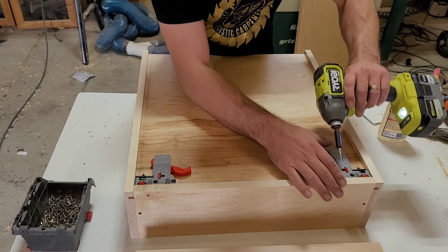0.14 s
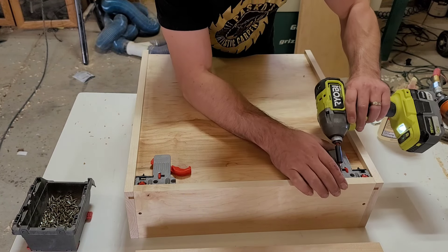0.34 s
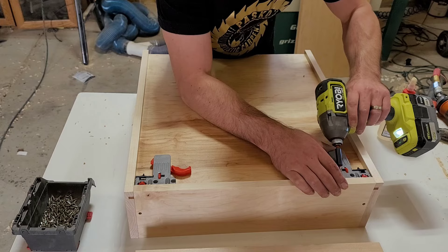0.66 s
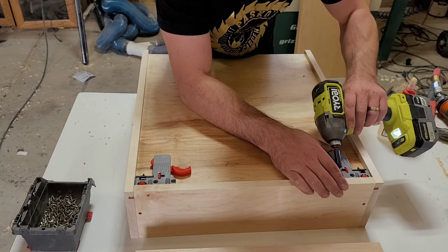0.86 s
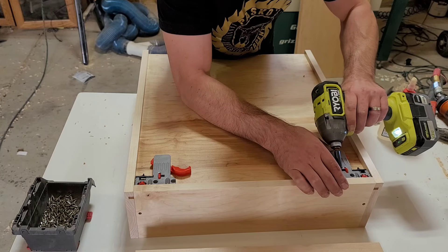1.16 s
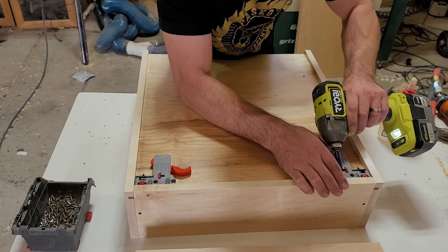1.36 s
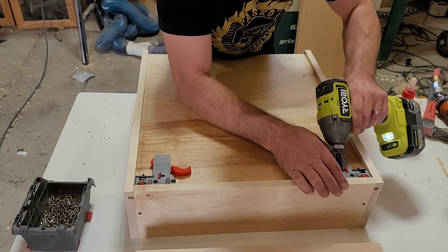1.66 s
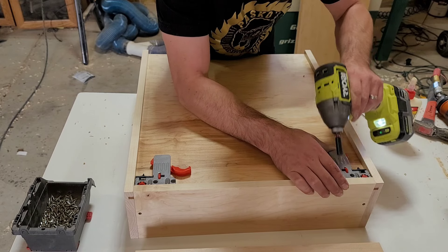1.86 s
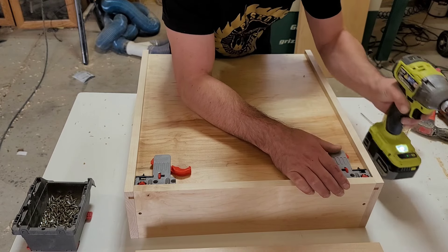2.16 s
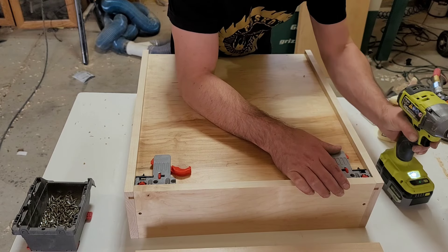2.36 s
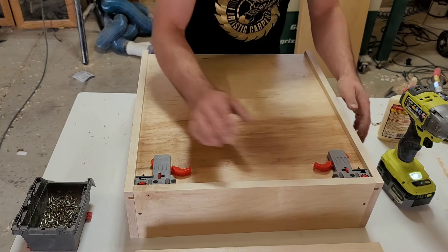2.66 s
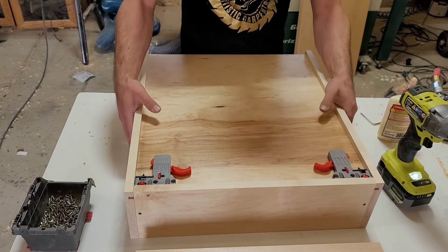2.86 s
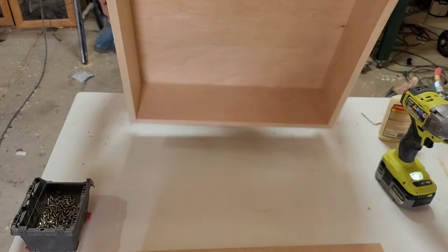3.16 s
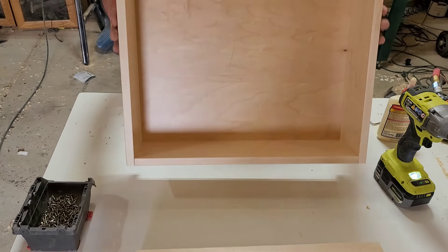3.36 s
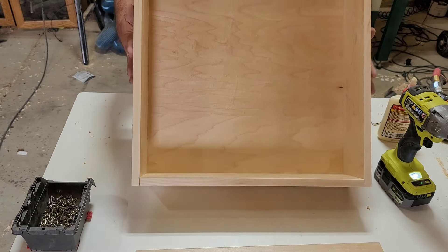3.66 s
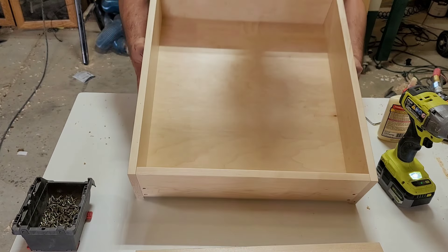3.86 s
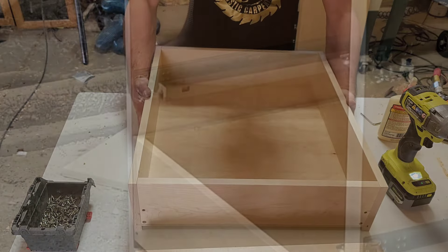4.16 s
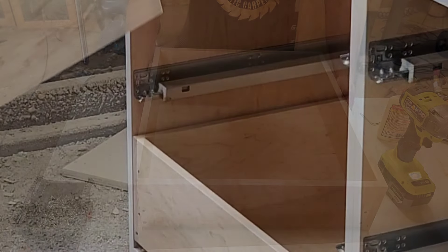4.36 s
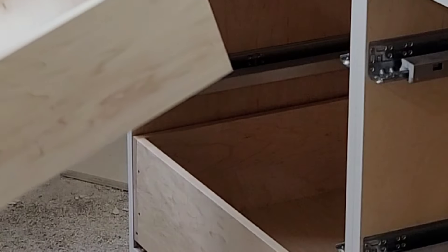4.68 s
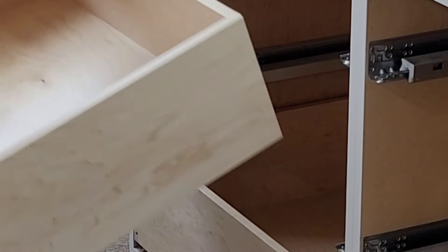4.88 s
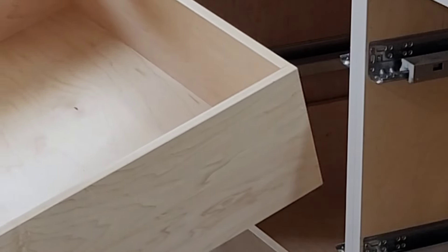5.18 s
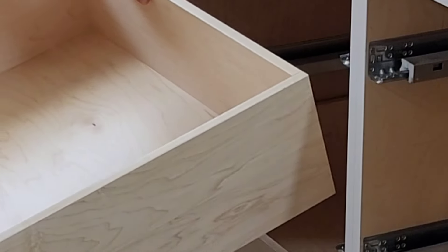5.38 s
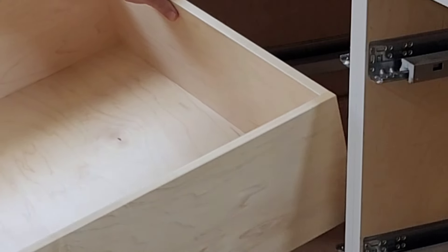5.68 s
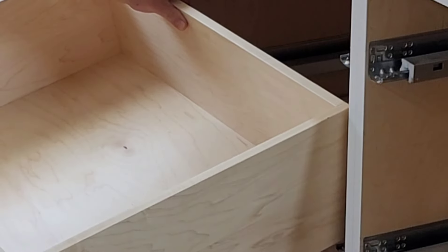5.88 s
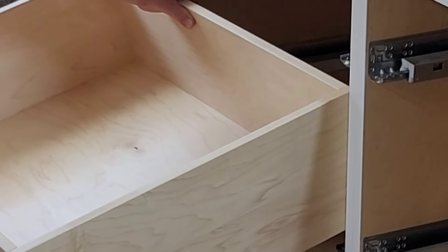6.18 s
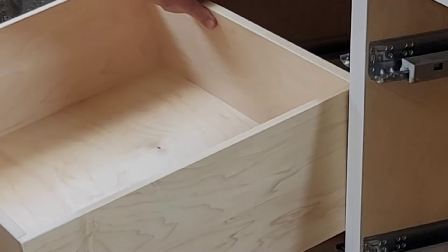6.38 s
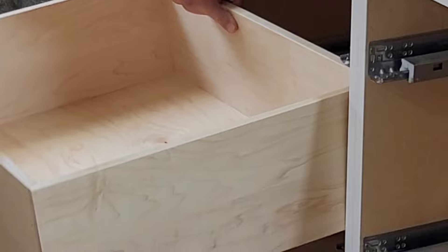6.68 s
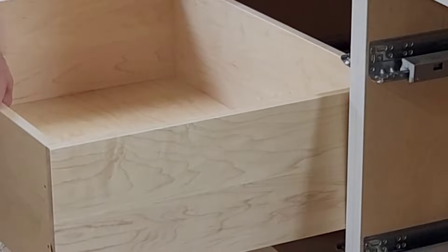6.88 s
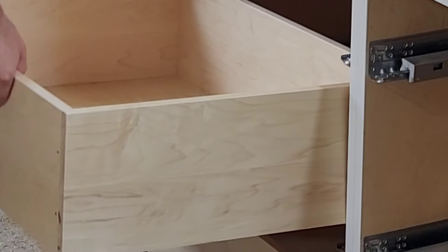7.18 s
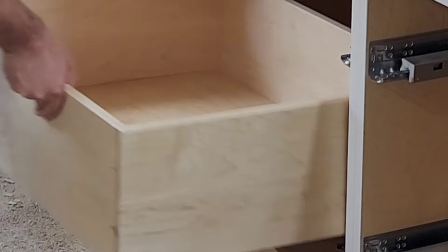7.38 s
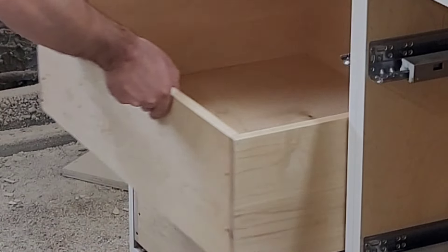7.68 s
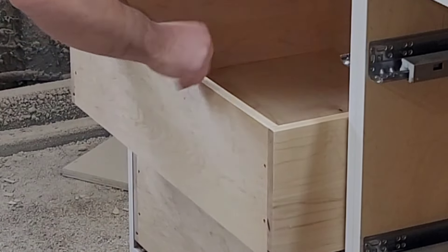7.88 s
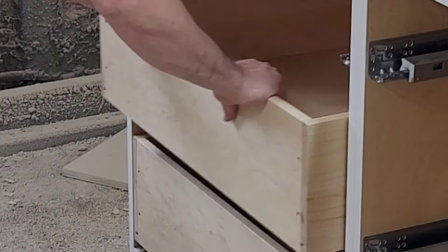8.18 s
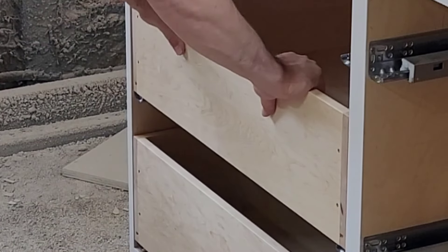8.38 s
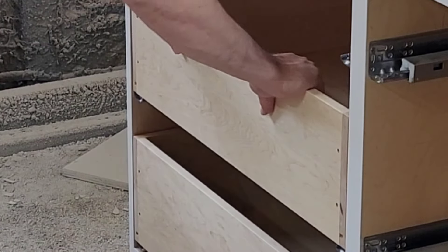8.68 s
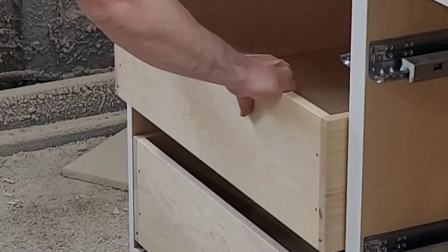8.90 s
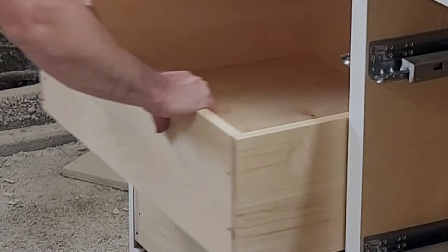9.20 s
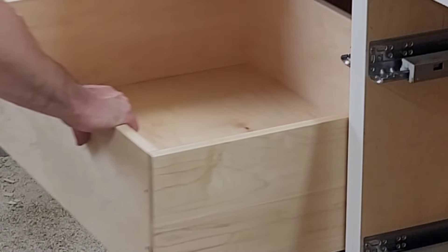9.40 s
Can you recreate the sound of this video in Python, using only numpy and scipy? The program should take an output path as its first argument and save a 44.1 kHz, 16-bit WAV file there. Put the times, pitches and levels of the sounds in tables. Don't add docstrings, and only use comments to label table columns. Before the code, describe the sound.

In a small hard workshop, close stereo microphones catch small ticks, then a cordless driver buzzing a screw into a hollow wooden drawer for under a second. The tool clunks down, the drawer is turned over with a loud double knock and edge tap. Hands brush wood, the drawer thumps low onto metal runners, scrapes, creaks, bangs home, snaps into its catches, and is finally pulled out softly.

```python
import sys
import numpy as np
from scipy import signal
from scipy.fft import rfft, irfft, next_fast_len
from scipy.io import wavfile
from scipy.ndimage import uniform_filter1d, map_coordinates

SR = 44100
rng = np.random.default_rng(int(sys.argv[2]) if len(sys.argv) > 2 else 0)


def to_wav(sig):
    pcm = np.clip(np.atleast_2d(sig), -1, 1) * 32767
    pcm = np.round(pcm).astype(np.int16)
    wavfile.write(sys.argv[1], SR, pcm.T)


def voltage_ratio(level):
    return 10 ** (np.asarray(level, float) / 20)


N = 421036


def rms_one(x):
    return x / np.sqrt(np.mean(x ** 2) + 1e-20)


def in_time(rows, fade=0.014):
    s, *columns = np.transpose(rows)
    t = np.arange(N) / SR
    curves = [np.interp(t, s, c) for c in columns]
    gate = np.interp(t, [s[0] - fade, s[0], s[-1], s[-1] + fade], [0, 1, 1, 0])
    return curves + [gate]


def at_hz(points, hz):
    return np.interp(np.log(hz), np.log(np.array(points)[:, 0] + 1), np.array(points)[:, 1])


def drift(rate, count=N):
    knots = rng.standard_normal(count // 200 + 400)
    r = np.exp(-2 * np.pi * rate * 200 / SR)
    slow = rms_one(signal.lfilter([1], [1, -2 * r, r * r], knots)[398:])
    return np.interp(np.arange(count) / 200, np.arange(len(slow)), slow)


def colour(x, spectrum, low_hz, high_hz, peaks=()):
    size = next_fast_len(x.shape[-1])
    hz = np.arange(size // 2 + 1) * SR / size + 1
    edges = np.sqrt((1 + (low_hz / hz) ** 8) * (1 + (hz / high_hz) ** 8))
    gain = voltage_ratio(at_hz(spectrum, hz)) / edges
    for centre, width, lift_db in peaks:
        gain *= 1 + (voltage_ratio(lift_db) - 1) / (1 + (2 * (hz - centre) / width) ** 2)
    return rms_one(irfft(rfft(x, size) * gain, size)[..., :x.shape[-1]])


# f/Hz, left-right correlation
COHERENCE = [(60, 0.93), (130, 0.99), (290, .88), (640, 0.51), (1400, 0.013), (3000, 0.007),
             (15000, 0.0098)]


def stereo_noise(count, grain_db=0.0, grain_rate=60):
    size = next_fast_len(count)
    alike = np.clip(at_hz(COHERENCE, np.arange(size // 2 + 1) * SR / size + 1), -1, 1)
    mid, side = rfft(rng.standard_normal((2, size)))
    both = np.sqrt(1 + alike) * mid + np.sqrt(1 - alike) * side * np.array([[1], [-1]])
    return rms_one(irfft(both, size)[:, :count]) * voltage_ratio(grain_db * drift(grain_rate, count=count))


def ring(clicks, hz, t60):
    r, w = voltage_ratio(-60 / (t60 * SR)), 2 * np.pi * hz / SR
    return signal.lfilter([0, np.sin(w)], [1, -2 * r * np.cos(w), r * r], clicks + 1e-18)


def dying(s, db, t60, rise=.001):
    start = round(s * SR)
    t = np.arange(min(round(t60 * SR), N - start)) / SR
    return slice(start, start + len(t)), voltage_ratio(db - 60 * t / t60) * (1 - np.exp(-t / rise))


def strokes(rows, offset_db=0, share=0, haste=1):
    t, power = np.arange(0, N + 64, 64) / SR, 0
    for s, press_db, bright_db, rise, fall in rows:
        away = np.maximum((s - t) / rise, haste * (t - s) / fall)
        level_db = press_db + offset_db + share * bright_db - 20 * away ** 1.353
        power = power + voltage_ratio(level_db) ** 2
    return np.interp(np.arange(N) / SR, t, np.sqrt(power))


# f/Hz, level/dB per Hz
AIR = [(12, -28.5), (20, -8.5), (46, -5), (162, -19), (247, -18), (326, -22), (674, -20.5), (996, -34.5),
       (1320, -27.5), (15800, -60.5)]


def room_tone():
    return voltage_ratio(-58) * colour(stereo_noise(N), AIR, 15, 17000)


# t/s of most pressure, pressure level/dB,
# speed as brightness level/dB, rise t/s per 20 dB, fall t/s per 20 dB
DRAG_STROKES = [(0.3, -54, -31.5, 4.4, 4), (0.834, -52.5, -28, 0.21, 0.9), (2.0, -58, -19, 1.6, 2),
                (2.464, -54.5, -28, .3, .3), (3.0, -56, -30, 1.55, 0), (3.33, -51, -20, 0.27, 0.34),
                (3.652, -40.5, -7.5, 0.073, 0.66), (3.86, -50, -14, .3, .5), (4.4, -56, -15, 0.24, 0.22),
                (4.62, -62, 3, 0.16, 0.3), (4.79, -57, -4.5, 0.12, .4), (5.3, -59, -9.5, 0.4, 0.2)]
# f/Hz, level/dB per Hz
DRAG_COLOUR = [(18, -48), (30, -14), (111, 5.5), (145, -5), (244, -3), (326, -7), (566, -10), (1010, -23),
               (1240, -18), (2100, -32), (5680, -24), (13200, -42.5), (15800, -62.5)]


def drag():
    noise = stereo_noise(N, grain_db=1.6, grain_rate=60)
    rumble = strokes(DRAG_STROKES) * colour(noise, DRAG_COLOUR, 35, 450)
    scrape_gain = strokes(DRAG_STROKES, offset_db=4, share=0.46, haste=1.0)
    hiss_gain = strokes(DRAG_STROKES, offset_db=-8.5, share=0.97, haste=1.1)
    scrape = scrape_gain * colour(noise, DRAG_COLOUR, 600, 2500)
    hiss = hiss_gain * colour(noise, DRAG_COLOUR, 2000, 19000)
    return rumble + scrape + hiss


# f/Hz, level/dB per Hz
HOUSING = [(500, -10.5), (900, -8), (1500, -1), (3000, 0), (5500, -3.5), (7000, -11), (10000, -12),
           (14500, -12), (16500, -23.5)]


def contact_noise():
    noise = stereo_noise(N, grain_db=-1.5, grain_rate=150)
    return noise, colour(noise, HOUSING, 740, 5400), colour(noise, HOUSING, 6000, 24000)


# t/s, peak level/dB, ring f/Hz,
# top end level/dB re peak, broad noise level/dB re ring
TICKS = [(0.014, -40.5, 1930, -36, -7), (0.385, -46, 2370, -34, -3.5), (0.543, -43, 2060, -31, -3),
         (0.8029, -33.5, 3370, -7, -4), (0.917, -37, 3050, -12, 6), (3.2828, -47, 1640, -6, -3),
         (5.257, -35, 1150, -46, -7), (5.775, -42, 6200, -28, -10.5), (6.47, -25, 1580, -30, -3),
         (6.6824, -44, 1300, -40, -5), (6.797, -38, 1460, -30.5, -6), (6.9012, -31, 1470, -40, -9.5),
         (7.9039, -40.5, 1370, -38, -2.5), (8.046, -49, 1280, -22.5, -1), (9.37, -27, 5030, -24, -21),
         (9.384, -26.5, 5450, -36, -28)]


def ticks(contact):
    noise, broad, top = contact
    out = np.zeros((2, N))
    for s, peak_db, hz, top_db, broad_db in TICKS:
        t60 = 0.083 * (1500 / hz) ** 1.7 + 0.019
        at, envelope = dying(s, peak_db - 5.5, t60, rise=0.0026)
        tone = rms_one(ring(noise[:, at], hz, 0.0076))
        out[:, at] += envelope * (tone + voltage_ratio(broad_db) * broad[:, at] + voltage_ratio(top_db - 6.5) * top[:, at])
    return out


# middle t/s, rms level/dB, half length t/s
RUSTLES = [
    (0.128, -68.5, 0.025),
    (0.259, -66.5, 0.016),
    (2.49, -62.5, 0.029),
    (2.915, -64.5, 0.044),
    (3.233, -67, 0.066),
    (4.48, -62.5, 0.071),
    (4.605, -60.5, 0.063),
    (4.762, -61, 0.059),
    (5.147, -70.5, 0.025),
]


def rustles(contact):
    _, broad, top = contact
    t = np.arange(N) / SR
    swell = sum(voltage_ratio(level_db) * np.exp(-((t - s) / half) ** 2) for s, level_db, half in RUSTLES)
    return swell * (broad + 0.49 * top)


# f/Hz, level/dB per Hz
KNOCK = [(180, -33.5), (300, 11), (502, -8.5), (612, -10), (990, -15.5), (1080, -19), (1330, -15.5),
         (1500, -22.5), (1920, -19), (2230, -24.5), (4950, -26), (15800, -60)]


def wood_noise():
    noise = stereo_noise(N, grain_db=2.5, grain_rate=80)
    return colour(noise, KNOCK, 480, 1300), colour(noise, KNOCK, 1500, 17000)


def blows(events, body, wood, ring_share, push_db, crack_rise, crack_t60):
    low, (knock, crack) = np.zeros(N), wood
    chance, out = rng.normal(0, 1, (len(events), len(body), 2)), np.zeros((2, N))
    for (s, body_db, knock_db, crack_db, thud_hz), draws in zip(events, chance):
        for (hz, mode_db, mode_t60), (strength, late) in zip(body, draws):
            near_db = -7 * abs(np.log2(hz / thud_hz))
            start = s + abs(late) * 0.55 / hz
            level_db = body_db + push_db + mode_db + near_db + 0.56 * strength
            at, envelope = dying(start, level_db, ring_share * mode_t60, rise=0.53 / hz)
            low[at] += envelope * np.sin(2 * np.pi * hz * np.arange(len(envelope)) / SR)
        knock_t60 = 0.19 * (200 / thud_hz) ** .45
        at, envelope = dying(s, body_db + knock_db - 3.0, knock_t60, rise=0.004)
        out[:, at] += envelope * knock[:, at]
        at, envelope = dying(s, body_db + crack_db - 4.5, crack_t60, rise=crack_rise)
        out[:, at] += envelope * crack[:, at]
    return out + low


# t/s, body peak level/dB, knock level/dB re body, crack level/dB re body, thud f/Hz
BENCH_BLOWS = [
    (0.938, -39.5, -21, -25, 143),
    (2.332, -13.5, -9, -5, 190),
    (2.5, -39, -29, -15, 159),
    (2.818, -22, -11.5, -29, 253),
    (2.867, -37.5, -16, -28.5, 143),
    (3.491, -1, -11, -21, 130),
    (3.532, 0, -15, -18, 250),
    (4.185, -4, -3, -13, 402),
    (4.481, -30.5, -11.5, -61, 358),
]
# f/Hz, level/dB, decay t60/s
BENCH_BODY = [(72, 3.5, 0.39), (96, -3, 0.22), (121, -2, 0.2), (162.2, -7.5, 0.5), (195.6, -3, 0.17),
              (253.3, -3, 0.17), (320, -8, 0.074), (355, -10.5, 0.12), (400, 2, 0.078), (493, -9, 0.09)]


def bench_blows(wood):
    return blows(BENCH_BLOWS, BENCH_BODY, wood, 0.66, push_db=-6.0, crack_rise=0.00086, crack_t60=.11)


def close_echoes(x):
    left_lag_s = 0.00016
    late = np.interp(np.arange(len(x)) - left_lag_s * SR, np.arange(len(x)), x)
    t = np.arange(SR // 20) / SR
    scatter = stereo_noise(len(t)) * voltage_ratio(-60 * t / .07) * (t > .0008)
    scatter /= np.sqrt(np.sum(scatter ** 2, axis=1, keepdims=True))
    return np.array([.7 * late, .85 * x]) + .6 * signal.oaconvolve(x[None], scatter, axes=1)[:, :len(x)]


# t/s, f/Hz, level/dB
WHINE = [
    (1.03, 10100, -70),
    (1.06, 10100, -58),
    (1.3, 9800, -60),
    (1.64, 9700, -58),
    (1.7, 10000, -56),
    (1.79, 10000, -72),
]
# t/s, whirr level/dB
EFFORT = [
    (1.04, -49.5),
    (1.07, -41),
    (1.246, -28),
    (1.318, -25),
    (1.542, -25.5),
    (1.67, -30.5),
    (1.69, -41.5),
    (1.75, -42.5),
    (1.8, -65),
]
# f/Hz, width/Hz, lift level/dB
BUZZ = [(199.8, 50, 5), (350, 22, 14), (554, 46, 4.5)]
# f/Hz, width/Hz, lift level/dB
SHELL = [(840, 110, 4.5), (1190, 100, 1), (1680, 300, 3.5), (3798, 1800, 4.5)]


def driver():
    span = slice(round(.9 * SR), round(1.9 * SR))
    whirr_db, gate = (c[span] for c in in_time(EFFORT, fade=.004))
    t = np.arange(span.start, span.stop) / SR
    since = t - 1.278
    hz = np.maximum(512 - np.maximum(-1550 * since, 660 * since), 200)
    phase = 2 * np.pi * np.cumsum(hz * (1 + .002 * drift(30, count=len(hz)))) / SR
    bite_s, release_s = 1.22, 1.66
    clean = np.interp(t, [bite_s - .04, bite_s, release_s, release_s + .06], [.15, .76, .76, .15])
    stack = 0
    for k in range(1, 26):
        wander = voltage_ratio(3.5 * drift(9, count=len(hz)))
        stack = stack + wander * np.cos(k * phase + rng.uniform(0, 1.3))
    stack /= np.sqrt(uniform_filter1d(stack ** 2, size=2000))
    teeth = 1 + 0.7 * np.cos(phase)
    balance = [[.9], [1.1]]
    rough, airy = (stereo_noise(len(hz)) * balance * teeth for _ in range(2))
    tonal = close_echoes(colour(stack, HOUSING, 700, 4300, SHELL))
    noisy = colour(rough, HOUSING, 1300, 8500)
    whirr = clean * tonal + np.sqrt(1 - clean ** 2) * noisy
    hiss = voltage_ratio(-5 - 17 * (t - 1)) * colour(airy, HOUSING, 6300, 17000)
    buzz = voltage_ratio(-16.5 + 12 * since) * colour(airy, [(100, -5), (700, -8.5)], 152, 650, BUZZ)
    throb = voltage_ratio(1.5 * np.cos(phase / 14) + 2.4 * drift(60, count=len(hz)))
    out = np.zeros((2, N))
    out[:, span] = voltage_ratio(whirr_db + 0.5) * gate * throb * (whirr + hiss + buzz)
    whine_hz, whine_db, on = in_time(WHINE)
    return out + on * voltage_ratio(whine_db + 3 * drift(60)) * np.sin(2 * np.pi * np.cumsum(whine_hz) / SR)


# t/s, top end peak level/dB, decay t60/s,
# broad noise level/dB re top end
SPITS = [(1.056, -36, 0.032, -3), (1.4052, -6, 0.011, -25), (1.5308, -26, 0.026, -14),
         (1.5634, -27, 0.023, -16), (1.6452, -28.5, 0.03, -4), (1.6594, -33, 0.021, 2),
         (1.732, -54, 0.014, 6), (1.7404, -54, 0.013, 4), (1.7544, -59, 0.015, 10),
         (1.823, -35.5, 0.015, 12), (2.106, -61, 0.021, -5), (1.8281, -23.5, 0.016, 4),
         (2.2019, -43, 0.029, 1), (2.5732, -53.5, 0.048, -11), (4.177, -27, 0.025, 16),
         (8.277, -16, 0.033, 10.5)]


def snaps(contact):
    _, broad, top = contact
    out = np.zeros((2, N))
    for s, peak_db, t60, broad_db in SPITS:
        at, envelope = dying(s, peak_db + 1.5, max(t60, .008), rise=0.0006)
        out[:, at] += envelope * (top[:, at] + voltage_ratio(broad_db - 4.5) * broad[:, at])
    return out


# middle t/s, rms level/dB, half length t/s, f/Hz
RUBS = [(3.69, -36, .035, 110), (3.785, -50, .012, 700), (3.8, -44, .04, 250), (3.9, -47, .04, 230),
        (3.955, -47, .025, 215), (3.95, -53, .012, 550), (4.07, -44, .03, 120), (4.06, -52, .03, 420),
        (4.155, -54, .02, 620), (9.2, -50, .1, 330), (9.385, -56, .02, 5200), (3.75, -58, .2, 1250),
        (4.43, -60, .015, 1700), (4.62, -55, .03, 1480), (4.78, -57, .04, 1350), (5.29, -56, .03, 1120),
        (5.8, -70, .02, 5350), (5.87, -70, .05, 5300), (5.86, -68, .06, 3500), (5.975, -66, .025, 5350),
        (5.96, -70, .03, 4950), (6.2, -68, .015, 3500), (6.28, -70, .02, 5200), (6.49, -52, .015, 5250),
        (6.69, -68, .02, 5250), (6.77, -70, .03, 5700), (6.93, -62, .04, 2250), (7.03, -71, .04, 6300),
        (7.04, -70, .04, 5300), (7.75, -56, .1, 4050), (7.78, -56, .08, 5150), (8.15, -54, .05, 4050),
        (8.275, -26, .018, 2800), (8.285, -30, .012, 1700), (8.335, -33, .025, 5300), (8.3, -31, .012, 620)]


def rubs():
    out = np.zeros((2, N))
    for s, level_db, half, hz in RUBS:
        at = np.arange(round((s - 2.5 * half) * SR), round((s + 2.5 * half) * SR))
        t60 = 45 / hz * (hz / 1000) ** .5
        tone = rms_one(ring(stereo_noise(len(at)), hz, t60))
        out[:, at] += voltage_ratio(level_db) * np.exp(-((at / SR - s) / half) ** 2) * tone
    return out


# t/s, peak level/dB, f/Hz, decay t60/s
PANEL_NOTES = [
    (3.325, -43, 320, .25),
    (4.184, -19, 1340, .08),
    (4.23, -29, 161, .5),
    (7.44, -15, 245, .2),
    (4.49, -37, 370, .14),
    (7.525, -16, 186, .45),
    (7.905, -36, 303, .2),
]


def panel_notes():
    out = np.zeros(N)
    for s, peak_db, hz, t60 in PANEL_NOTES:
        at, envelope = dying(s, peak_db, t60, rise=.008)
        out[at] += envelope * np.sin(2 * np.pi * hz * np.arange(len(envelope)) / SR)
    return out


def patchy(x, patch_db):
    spectra = signal.stft(x, nperseg=256)[2]
    bins, frames = spectra.shape[1:]
    field = rng.standard_normal((30, frames // 5 + 2))
    pitch_place = np.sqrt(np.arange(bins) / bins) * 29
    where = np.meshgrid(pitch_place, np.arange(frames) / 5, indexing="ij")
    gain = voltage_ratio(patch_db * map_coordinates(field, where, order=1))
    return rms_one(signal.istft(spectra * gain, nperseg=256)[1][:, :x.shape[1]])


# t/s of most pressure, pressure level/dB,
# speed as brightness level/dB, rise t/s per 20 dB, fall t/s per 20 dB
SLIDE_STROKES = [(5.95, -52.5, -12, 0.31, 0.48), (6.07, -39, -35, 0.11, 0.02), (6.27, -32, -49, 0.23, 0.54),
                 (6.478, -33, -29.5, 0.13, 0.3), (6.77, -39.5, -25, .2, 0.43),
                 (6.93, -39.5, -23.5, 0.061, 0.3), (7.174, -37, -18.5, 0.11, 0.27),
                 (7.28, -35, -17.5, 0.1, 0.2), (7.35, -40.5, 1.5, 0.058, 0.18),
                 (7.425, -8.5, -17.5, 0.015, 0.2026), (7.515, -4, -24, 0.11, 0.083),
                 (7.6, -22.5, -23, 0.088, 0.17), (7.7, -38, -10, 0.3, .3), (7.84, -45, -8, .3, .06),
                 (8.056, -41, -19.5, 0.0055, .4), (8.14, -36, -9.5, 0.08, 0.4),
                 (8.232, -30, 5.5, 0.003, 0.08), (8.264, -30, 8, .01, .12), (8.29, -26.5, 9, 0.053, 0.113),
                 (8.335, -15.5, -3.5, 0.065, 0.0924), (8.41, -27, -14, .1, 0.16),
                 (9.03, -48.5, -15.5, 0.3, .2), (9.24, -33, -41, 0.33, 1), (9.44, -34, -23, 0.14, 0.9),
                 (9.52, -30.5, -20, 0.11, .2)]
# f/Hz, level/dB per Hz
SLIDE_COLOUR = [(18, -37.5), (30, -2), (88, 19.5), (152, 0.5), (188, -1), (286, -11.5), (509, -18),
                (698, -19), (755, -20), (3110, -25), (3740, -30), (5250, -25), (7010, -39.5), (12500, -38),
                (15800, -38.5)]
# f/Hz, width/Hz, lift level/dB
RAILS = [(188, 13, 11), (249, 79, 8), (330, 25, 6.5), (504.5, 20, 7.5), (583, 28, 7.5), (768, 21, 5),
         (1100, 20, 3), (1460, 20, 9), (1780, 30, 2), (2446, 13, 9), (2740, 26, 6.5), (3490, 19, 9),
         (5330, 250, 4)]


def slide():
    span = slice(round(5.5 * SR), N)
    noise = patchy(stereo_noise(N - span.start, grain_db=2.0, grain_rate=42), patch_db=3.0)
    rumble_gain = strokes(SLIDE_STROKES, offset_db=-4.5)[span]
    scrape_gain = strokes(SLIDE_STROKES, offset_db=-2.2, share=0.43, haste=1.28)[span]
    hiss_gain = strokes(SLIDE_STROKES, offset_db=2.13, share=1.0, haste=1.32)[span]
    sizzle_gain = strokes(SLIDE_STROKES, offset_db=-16, share=1.2, haste=1.4)[span]
    rumble = rumble_gain * colour(noise, SLIDE_COLOUR, 41, 450, RAILS)
    scrape = scrape_gain * colour(noise, SLIDE_COLOUR, 398, 1530, RAILS)
    hiss = hiss_gain * colour(noise, SLIDE_COLOUR, 2000, 6500, RAILS)
    sizzle = sizzle_gain * colour(noise, SLIDE_COLOUR, 6100, 17000)
    out = np.zeros((2, N))
    out[:, span] = rumble + scrape + hiss + sizzle
    return out


# t/s, body peak level/dB, knock level/dB re body, crack level/dB re body, thud f/Hz
RUNNER_BLOWS = [(5.655, -5, -29, -29, 90.4), (5.712, -6.5, -44, -47, 121), (5.801, -13.5, -48, -55, 70),
                (6.021, -9, -34, -39, 86.1), (6.209, -17, -22, -30.5, 188), (6.247, -15, -50, -46, 102),
                (6.476, 0, -21, -26.5, 88), (6.492, -11, -20.5, -54, 272), (7.405, -7, -5, -14, 283),
                (7.44, -7, -4, -12, 250), (7.475, -9, -3, -12, 400), (7.513, -3, -9, -16, 192),
                (7.901, -37, -8, -13, 306), (8.258, -15, -16, -14, 130), (8.325, -5, -22, -16, 100),
                (9.177, -29.5, -19, -40, 87), (9.239, -22.5, -29, -57, 78.1)]
# f/Hz, level/dB, decay t60/s
RUNNER_BODY = [(58.1, -7, 0.9), (79, -1.5, 0.7), (101.7, -3, 0.42), (116, 0, 0.18), (139.7, -8, 0.5),
               (188, -3, 0.3), (272, -14, 0.45), (306, -10, 0.18), (366.3, -9, 0.31), (490.5, -7, .2)]


def runner_blows(wood):
    return blows(RUNNER_BLOWS, RUNNER_BODY, wood, 0.46, push_db=-7.0, crack_rise=0.0071, crack_t60=.13)


# t/s, peak level/dB
CREAKS = [(7.099, -44), (7.125, -42), (7.16, -38), (7.178, -38), (7.197, -38), (7.231, -33), (7.244, -30),
          (7.278, -30), (7.297, -33), (7.316, -31), (7.335, -38)]
# f/Hz, level/dB, decay t60/s
CREAK_MODES = [(630, 0, 0.05), (930, -1, 0.04), (1370, -2, 0.05), (1640, -10, 0.04)]


def creaks():
    out, noise = np.zeros((2, N)), stereo_noise(N, grain_db=4.0, grain_rate=90)
    chance = rng.normal(0, 1, (len(CREAKS), len(CREAK_MODES), 2))
    for (s, peak_db), draws in zip(CREAKS, chance):
        for (hz, mode_db, t60), (strength, shift) in zip(CREAK_MODES, draws):
            at, envelope = dying(s, peak_db + mode_db - 5 + 2.5 * strength, .1, rise=.004)
            slip_hz = hz * (1 + .035 * shift)
            out[:, at] += envelope * rms_one(ring(noise[:, at], slip_hz, t60))
    return out


def room(x):
    t60_s, top_t60_s, gap_s = 0.32, 0.19, .006
    t, noise = np.arange(SR // 2) / SR, stereo_noise(SR // 2)
    dull = signal.sosfilt(signal.butter(1, 2500, fs=SR, output="sos"), noise)
    tail = dull * voltage_ratio(-60 * t / t60_s) + (noise - dull) * voltage_ratio(-60 * t / top_t60_s)
    tail = signal.sosfilt(signal.butter(2, 130, "high", fs=SR, output="sos"), tail * (t > gap_s))
    tail /= np.sqrt(np.sum(tail ** 2) / 2)
    return voltage_ratio(-9.5) * signal.fftconvolve(x[None], tail, axes=1)[:, :N]


def scene():
    contact, wood = contact_noise(), wood_noise()
    side = voltage_ratio(np.array([[-.5], [.5]]))
    near = ticks(contact) + rustles(contact) + side * bench_blows(wood) + driver() + snaps(contact)
    near += panel_notes() + runner_blows(wood) + creaks()
    diffuse = room_tone() + side * drag() + rubs() + slide()
    return near + room(near.mean(axis=0)) + diffuse


def roll_off(x):
    return signal.sosfilt(signal.butter(12, 16830, fs=SR, output="sos"), x)


def record(dry):
    heard = signal.sosfilt(signal.butter(2, 37, "high", fs=SR, output="sos"), dry)
    heard = 1.565 * np.tanh(heard / 1.317)
    heard = signal.sosfilt(signal.ellip(10, .5, 60, 15950, fs=SR, output="sos"), heard)
    return roll_off(heard)


dry = scene()
out = record(dry)
to_wav(out)
```